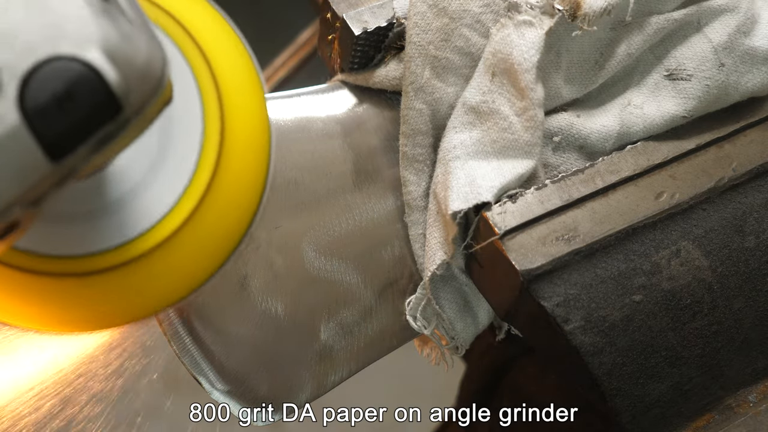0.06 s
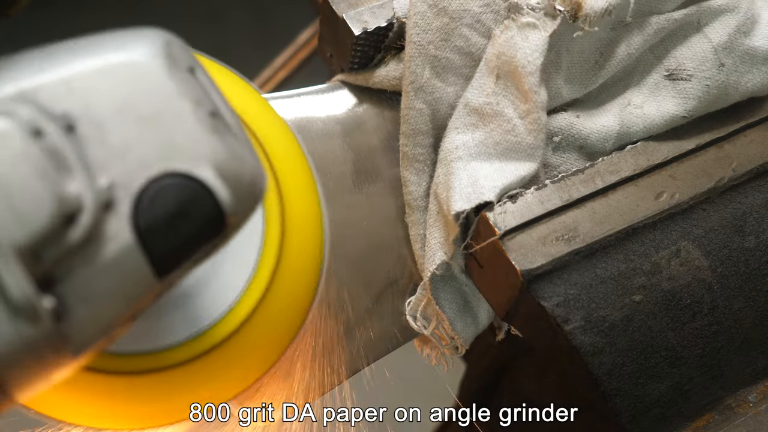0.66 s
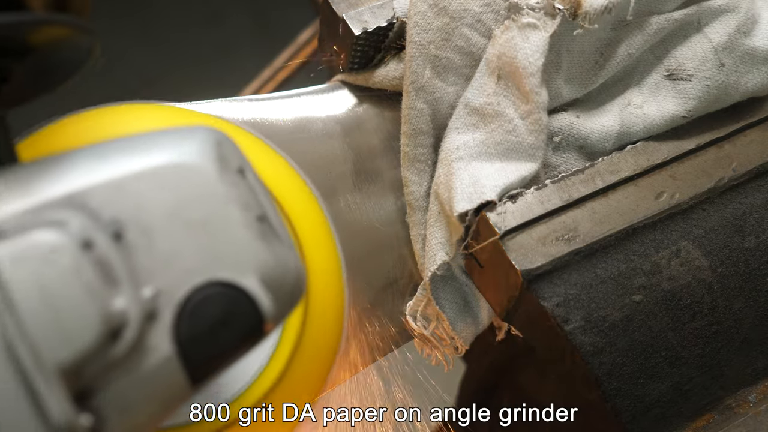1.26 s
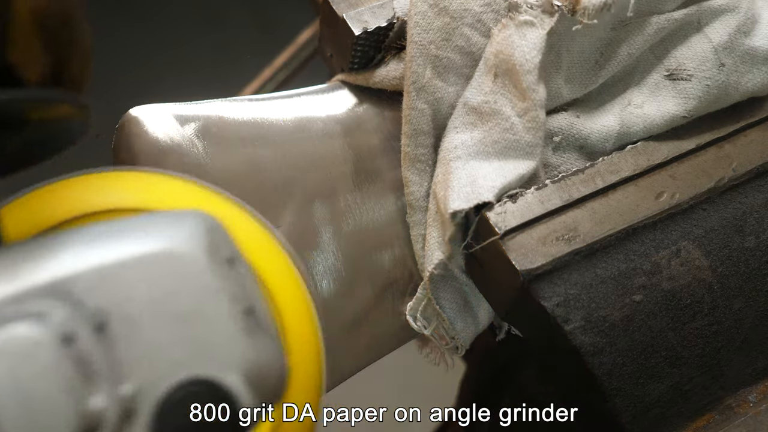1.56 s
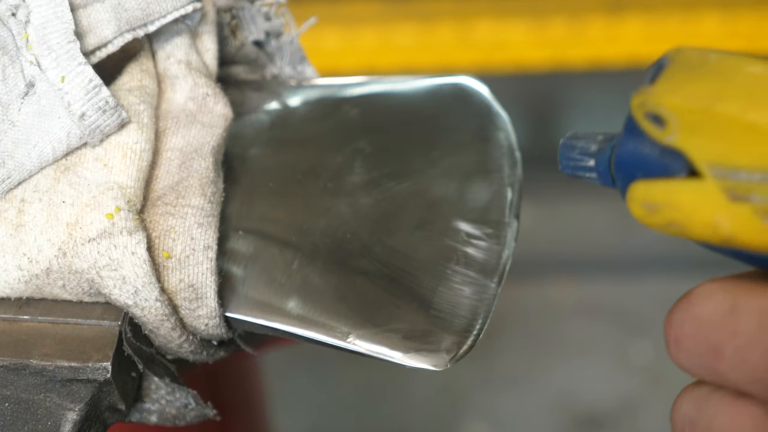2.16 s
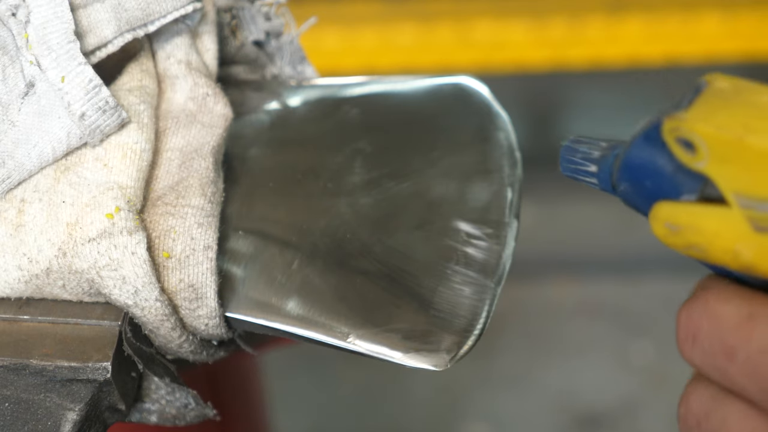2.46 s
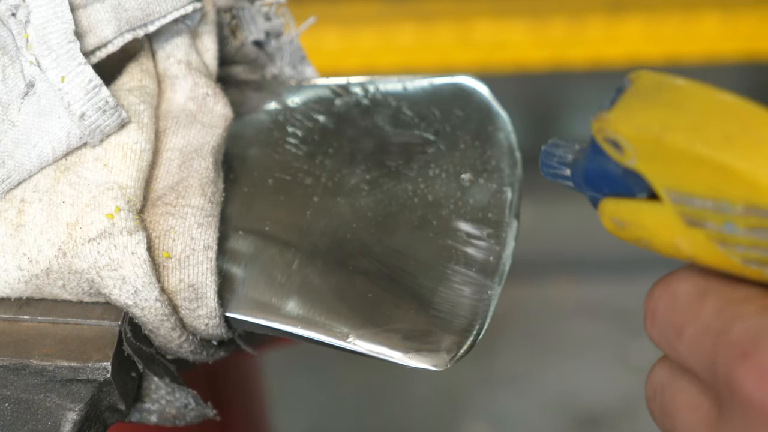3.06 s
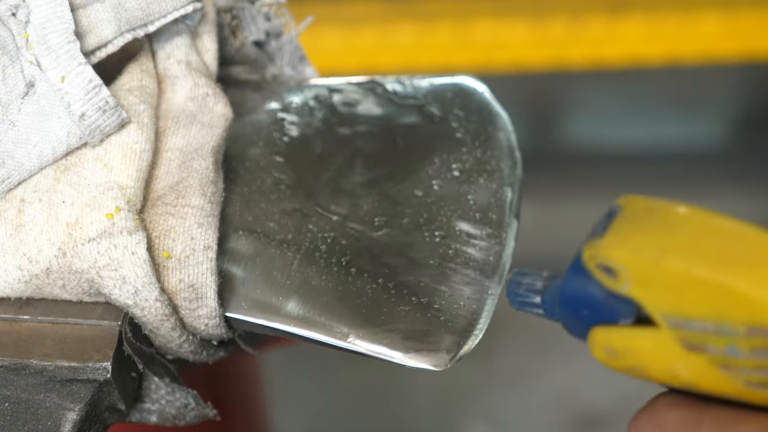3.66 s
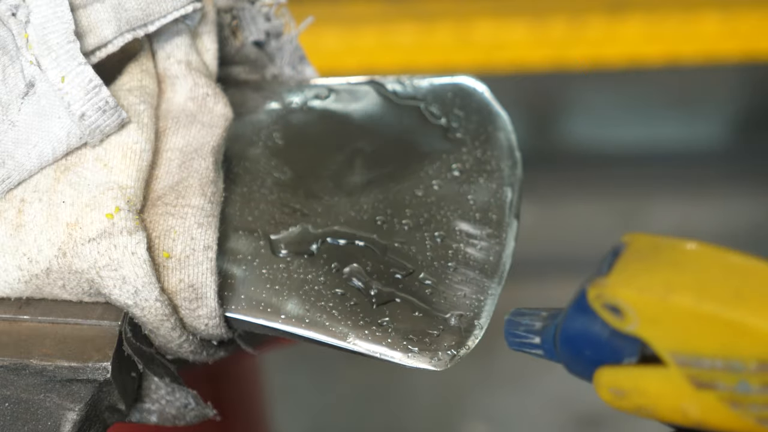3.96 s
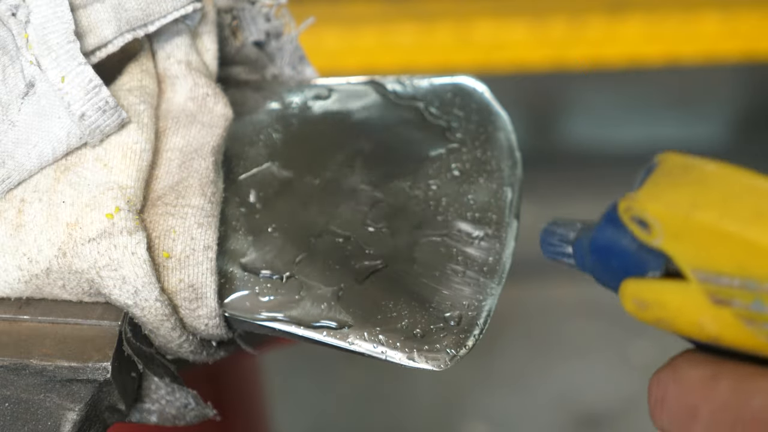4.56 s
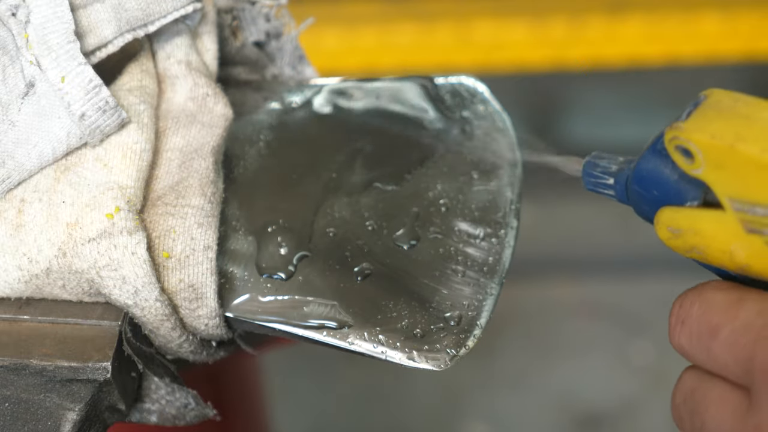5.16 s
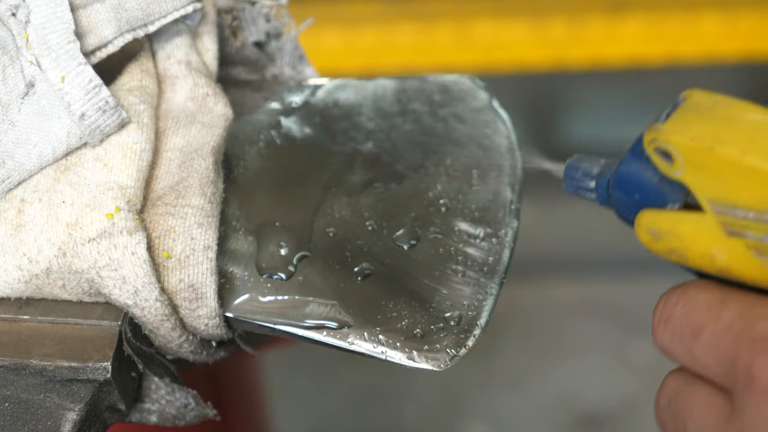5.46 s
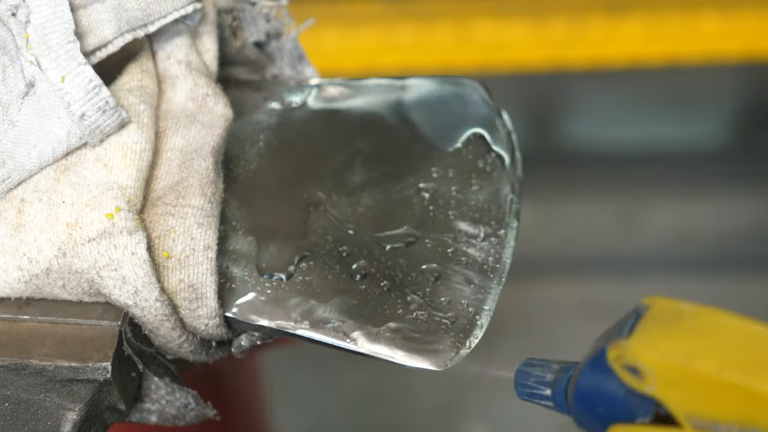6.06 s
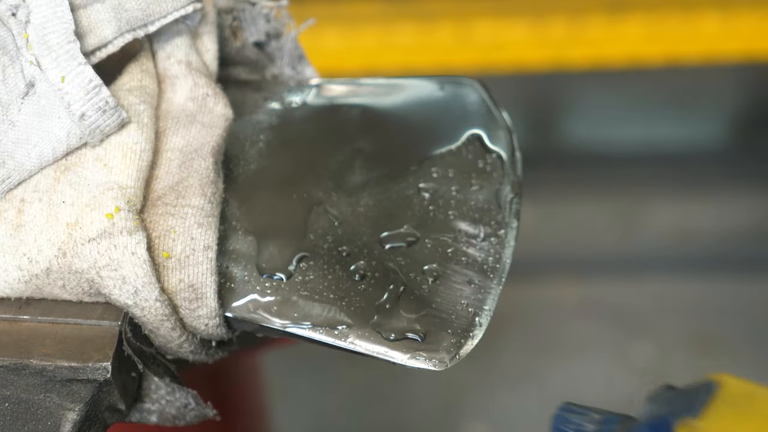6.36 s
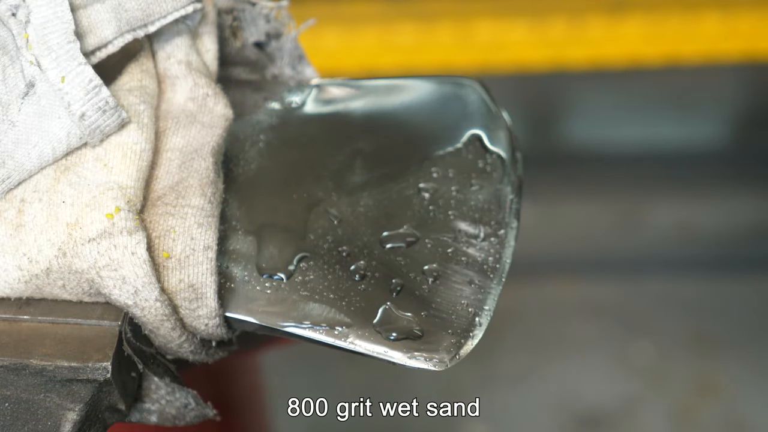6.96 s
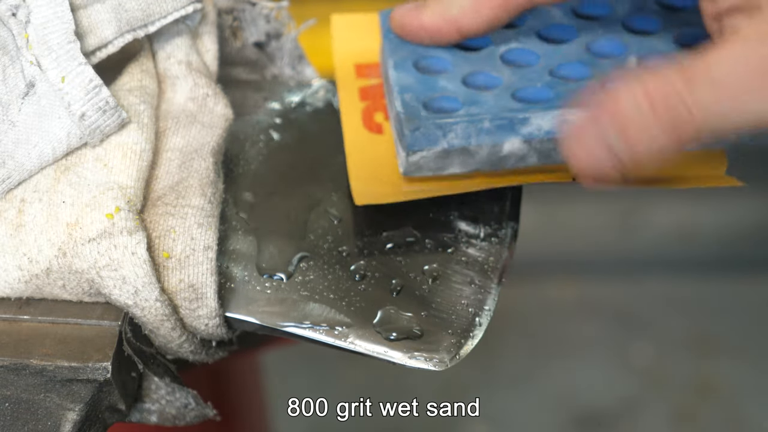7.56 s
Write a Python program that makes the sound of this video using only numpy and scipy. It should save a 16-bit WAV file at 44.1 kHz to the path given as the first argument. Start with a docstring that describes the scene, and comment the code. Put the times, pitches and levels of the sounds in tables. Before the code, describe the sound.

An angle grinder sands a steel axe head with a loud rasp and a high, wavering whine, then fades away. A trigger spray bottle sputters and spits, then mists water in quick squeezes, about four a second, each with a plastic creak, a small thump and a hiss. Near the end, sandpaper rustles and a rubber block knocks onto the metal. The sounds are close, over a low workshop rumble and hum.

```python
"""Grinding, misting and wet-sanding an axe head.

An angle grinder sands the steel, its disc rasping and its bevel gears whining, and fades away.
A trigger bottle sputters the air out of its pump, then mists the steel with water, about four
squeezes a second, each with a creak, a thump and a hiss. Wet-sanding paper rustles and a rubber
block knocks down on the metal. The workshop rumbles and hums underneath."""
import sys
import numpy as np
from scipy import signal
from scipy.fft import rfft, irfft, next_fast_len
from scipy.io import wavfile

SR = 44100
rng = np.random.default_rng(int(sys.argv[2]) if len(sys.argv) > 2 else 0)


def bounce(signal):
    """Save signal as a 16-bit WAV file at the path given by the first command-line argument."""
    frames = np.transpose(np.atleast_2d(signal))
    limited = np.clip(frames, -1, 1)
    pcm = np.round(limited * 32767).astype(np.int16)
    wavfile.write(sys.argv[1], SR, pcm)


N = 344421
TIME = np.arange(N) / SR

# Noise colours, each with columns: frequency_hz, density_db
ROOM_TONE = [(13, -54), (22, -4), (59, -4.5), (160, -12), (174, -11), (194, -19), (270, -16.5), (356, -16),
             (387, -19.5), (539, -20), (1130, -26), (2670, -31), (3320, -30.5), (8490, -37.5), (16000, -56)]  # the workshop's rumble
PAPER_COLOUR = [(240, -34), (570, -8), (1110, -11), (1370, 0), (1530, 4), (1750, -2), (2200, -6), (2800, 0),
                (3400, 1.5), (4310, 1), (6740, -3.5), (7700, 1.5), (8800, 1.5), (9900, -11), (12800, -8.5),
                (16000, -18)]  # abrasive paper rubbing
SPIT_COLOUR = [(600, -24), (1500, 0), (3000, 3.5), (5000, 0), (8400, 8.5), (10500, -4), (13000, 8.5),
               (16000, -14)]  # coarse spray
GURGLE_COLOUR = [(500, -9), (950, 16.5), (2000, -15), (3500, 11), (6000, -0.5)]  # air and water in the pump
MIST_COLOUR = [(240, -10), (400, -2), (496, -15), (607, -4), (1870, -10.5), (2220, -8), (4800, -12),
               (8240, -11), (10400, -20), (13900, -5), (16000, -11)]  # fine spray
JET_WHISTLE = [(4000, -11), (5800, -7.5), (6800, -8), (8300, 8), (9600, -25), (11000, -34)]  # the water jet's lower voice
JET_SIZZLE = [(9000, -22), (11000, -11), (13000, -2), (15000, -2), (16000, -9)]  # its upper voice
GEAR_RATTLE = [(3800, -35), (4400, 10), (4750, 15.5), (5300, 14), (5800, 6), (6100, -29)]  # loaded gears
DISC_RASP = [(100, -24.5), (200, -21.5), (250, -12.5), (400, -11), (520, -5.5), (750, -7), (920, -6),
             (1080, 1), (1400, -4.5), (1800, -6), (2250, -3), (3000, -6), (4000, -4), (4500, -9.5)]  # the disc on steel
DISC_GRIT = [(3500, -38), (4300, -12), (5900, 2.5), (6300, -4), (7600, -3.5), (8700, 1.5), (9600, -9),
             (11000, -9), (12500, -5.5), (14000, -4.5), (16000, -18)]  # the hiss of its grit

# Ringing modes, each with columns: pitch_hz, level_db, t60_s
BLOCK_THUD = [(74, -12, 0.069), (157, -9, 0.032), (257, 6, 0.021), (416, 0.5, 0.022), (584, -2, 0.035)]  # the damped block's low end
BLOCK_CLACK = [(820, 0, 0.022), (1075, -2.5, 0.027), (1380, 4, 0.0099), (2126, -6, 0.037),
               (3060, -3, 0.0068), (4900, -21, 0.0065), (7800, -25, .006)]  # its bright attack
BOTTLE_MODES = [(162, -6, 0.05), (225, 1.5, 0.045), (296, 2, 0.023), (417, -4, 0.032)]  # the bottle's body
SPRING_MODES = [(697, 3, 0.011), (865, -1, 0.029), (1120, 0.5, 0.0054), (1476, -5, 0.026),
                (1940, 0.5, 0.016), (2120, -1, 0.017), (3400, -1.5, 0.0053), (4230, -6, 0.0058)]  # the return spring
LEVER_MODES = [(4580, -9.5, 0.0065), (5720, -10.5, 0.015), (8450, -5.5, 0.0058), (11000, 0, 0.00084),
               (11900, -7.5, 0.0027), (14200, -5, .002)]  # the trigger's thin plastic

# The room tone swells: time_s, level_db
ROOM_SWELL = [(0, -63), (1.2, -58), (2.2, -48), (7.8, -48.5)]
# Paper slides over hand and block: centre_s, half_length_s, level_db, sheet_pitch_hz
SCRAPES = [(6.521, 0.018, -53, 3040), (6.71, 0.018, -49.5, 2040), (6.795, 0.016, -53, 2000),
           (7.022, 0.034, -47.5, 2960), (7.212, 0.013, -34, 3160), (7.259, 0.011, -40, 2600),
           (7.313, 0.012, -40.5, 1500), (7.401, 0.027, -31, 2790), (7.525, 0.019, -34.5, 2530),
           (7.594, 0.0064, -39.5, 4450), (7.622, 0.021, -36.5, 3580), (7.771, 0.011, -46, 3380)]
# Block and paper knock: start_s, clack_db, thud_db, crack_db
KNOCKS = [(6.602, -54, -72, -47), (6.79, -54, -58, -39), (7.069, -26, -47, -30), (7.183, -55, -58, -35.5),
          (7.428, -31, -39, -33), (7.4452, -11.5, -34, -23.5), (7.4529, -9, -20, -28),
          (7.71, -34, -40, -40.5), (7.732, -36, -49, -44)]

# The trigger creaks, thumps on its stop and lets the mist run:
# stop_s, thump_db, creak_lead_s, creak_db, mist_delay_s, mist_length_s, mist_db
SQUEEZES = [(2.883, -38, 0.083, -30.5, .124, 0.044, -50), (3.283, -36.5, 0.088, -29.5, 0.071, 0.17, -43),
            (3.549, -26, 0.057, -26.5, 0.038, 0.099, -40.5), (3.81, -33.5, 0.047, -41, 0.054, 0.17, -49.5),
            (4.097, -35, .054, -33.5, 0.066, 0.18, -49), (4.416, -35, 0.057, -28.5, 0.051, 0.11, -42.5),
            (4.691, -34, 0.051, -34, 0.044, 0.13, -47.5), (4.95, -33.5, .052, -36.5, 0.075, 0.078, -52),
            (5.202, -28.5, 0.046, -34.5, .045, 0.12, -52.5), (5.457, -33.5, 0.037, -39, 0.054, 0.12, -50),
            (5.716, -33.5, 0.046, -35.5, 0.03, 0.12, -50), (5.976, -35, 0.05, -34.5, 0.047, 0.19, -51),
            (6.237, -27, 0.047, -28.5, 0.019, 0.089, -50), (6.449, -37.5, 0.051, -32, .015, 0.022, -65)]
# The spring rattles as the trigger is let go: start_s, level_db, bounce_relative_db
RELEASES = [(3.469, -32, -12), (3.687, -30, -3), (3.791, -33, -20), (3.977, -27.5, -1), (4.13, -37.5, -10),
            (4.294, -28.5, 0), (4.586, -33, -18), (4.836, -31.5, 0.5), (5.096, -28, -3), (5.333, -40, -8),
            (5.607, -28, -3), (5.855, -28.5, -4.5), (6.121, -34, -1.5), (6.336, -32, -3.5)]
# Air sputters out of the dry pump: start_s, length_s, spit_db, gurgle_db
SPUTTERS = [(2.593, 0.072, -43.5, -38.5), (2.607, 0.053, -33, -54), (2.684, .03, -56, -47),
            (2.927, 0.0076, -34, -40), (2.976, 0.021, -35.5, -43), (3.0485, 0.059, -26, -45),
            (3.161, 0.0036, -31.5, -33.5), (3.3084, 0.018, -28, -41), (3.573, 0.077, -42, -49),
            (3.663, 0.048, -47, -47), (3.883, 0.012, -32.5, -55)]
# Drips and air bubbles plink: start_s, level_db, pitch_hz
PLINKS = [(2.7687, -38, 2110), (2.92, -34, 1570), (2.952, -37, 1600), (3.1921, -53, 3220),
          (3.2544, -26, 2350), (3.543, -50, 1760), (6.8806, -40, 2550)]
# Air pockets squeak through the nozzle: start_s, length_s, level_db, first_pitch_hz, last_pitch_hz
CHIRPS = [(2.9892, 0.0044, -13.5, 7460, 7900), (3.303, 0.0052, -16.5, 8300, 9100),
          (3.8204, 0.0043, -25.5, 6000, 9200), (4.433, 0.005, -25, 8100, 12600),
          (4.444, .003, -28, 8400, 11500), (4.71, 0.0068, -29, 6900, 12900),
          (5.23, 0.026, -33.5, 7800, 8900), (5.475, 0.0089, -29.5, 5150, 8100),
          (5.487, 0.0029, -24.5, 7500, 8700), (5.726, 0.0043, -23, 7600, 9400),
          (5.993, .011, -19, 6750, 8800), (6.242, 0.0032, -24, 7500, 9160)]
# The jet bursts out before it fans into mist: start_s, length_s, whistle_db, sizzle_db
JETS = [(2.991, .005, -22.5, -40), (3.318, .017, -35, -30), (3.873, .004, -44, -29),
        (4.149, 0.039, -45, -41), (4.456, 0.012, -40, -37), (4.719, .011, -41, -41),
        (4.995, 0.033, -48.5, -41), (5.239, .013, -42, -39), (5.512, 0.0094, -36, -37),
        (5.734, .011, -42, -40), (6.012, 0.02, -40.5, -39), (6.259, .005, -43, -33)]
# Coarse, airy spray sizzles on the dry steel: start_s, length_s, level_db
SIZZLES = [(3.332, 0.13, -41), (3.553, 0.11, -40), (3.885, 0.038, -38)]
# The biggest drops snap at the nozzle: start_s, level_db, pitch_hz
BIG_DROPS = [(2.7702, -27, 13000), (2.972, -18, 8000), (3.007, -9, 12500), (3.3425, -12, 14000),
             (3.4193, -16, 14200), (3.45, -22, 13400), (3.572, -10, 12900), (3.583, -22, 14000),
             (3.634, -12, 13100), (3.664, -13, 13900), (3.683, -13, 14100), (3.7023, -11, 14100),
             (3.854, -16, 11500), (3.861, -15, 13800), (3.9172, -17, 13900), (3.9757, -14.5, 13000),
             (4.5593, -20, 13700), (4.608, -23, 13000), (4.7469, -17, 8200), (4.907, -31, 12000),
             (4.923, -27, 11500), (4.9884, -16, 11800), (5.436, -31, 13800)]

# The spindle gives way and the gears whine under the hand's pressure:
# time_s, extra_turns_per_s, whine_db
SPINDLE = [(0, 0.94, -28), (0.1, 1.12, -30.5), (0.45, 0.8, -29.5), (0.63, 0.1, -23.3), (0.76, 0.47, -26),
           (0.9, 0, -20.5), (1.01, -0.45, -27), (1.16, 0.6, -21), (1.28, 0.08, -28), (1.39, 1.12, -22),
           (1.48, -0.15, -24.5), (1.55, -0.23, -29.5), (1.67, 4.9, -48), (1.95, 1.9, -41),
           (2.25, 1.33, -30.5), (2.37, -0.16, -28.5), (2.45, 0.5, -27), (2.55, -0.1, -27)]
# Tones of the turning disc and motor: multiple_of_turning_rate, level_db
DISC_ORDERS = [(2, -12.5), (3, -11.5), (4, 0), (6, -5), (8, -20), (16, -6), (17, -14), (31, -30)]
MOTOR_ORDERS = [(1, -16), (2, -13.5), (6, -16), (8, -17), (9, -19), (12, -19)]

CROWN_TEETH, PINION_TEETH, NOMINAL_TURNS_PER_S = 38, 11, 138


def from_db(db):
    """Decibels to gain."""
    return 10 ** (np.asarray(db) / 20)


def rms_one(x):
    """Scale to rms 1."""
    return x / np.sqrt(np.mean(x ** 2) + 1e-20)


def in_time(rows):
    """Each column of an automation curve at every sample."""
    s, *columns = np.transpose(rows)
    return [np.interp(TIME, s, c) for c in columns]


def noise(colour):
    """Noise of the given colour, rolling off steeply beyond its ends; rms 1."""
    hz, level_db = np.transpose(colour)
    size = next_fast_len(N, True)
    f = np.fft.rfftfreq(size, 1 / SR) + 1e-3
    skirts = np.minimum(1, np.minimum(f / hz[0], hz[-1] / f)) ** 2
    gain = from_db(np.interp(np.log(f), np.log(hz), level_db)) * skirts
    return rms_one(irfft(rfft(rng.standard_normal(size)) * gain)[:N])


def drift(rate_hz, hop=40):
    """A smooth random wander; rms about 1."""
    r = np.exp(-2 * np.pi * hop * rate_hz / SR)
    slow = signal.lfilter([1], [1, -2 * r, r * r], rng.standard_normal(N // hop + 2002))[2000:]
    return np.interp(np.arange(N) / hop, np.arange(len(slow)), rms_one(slow))


def clicks(times, level_db):
    """One click at each time."""
    out = np.zeros(N)
    np.add.at(out, np.clip(np.round(np.asarray(times) * SR).astype(int), 0, N - 1), from_db(level_db))
    return out


def die_away(x, t60):
    """Each click becomes a falling envelope of its own height."""
    return signal.lfilter([1], [1, -from_db(-60 / (t60 * SR))], x + 1e-18)


def ring(x, hz, t60):
    """A unit click sets a sine of height 1 ringing."""
    r, w = from_db(-60 / (t60 * SR)), 2 * np.pi * hz / SR
    return signal.lfilter([0, np.sin(w)], [1, -2 * r * np.cos(w), r * r], x + 1e-18)


def strike(times, level_db, modes, travel_s, detune=0):
    """Hits ring a body's modes, each time anew; low bending waves arrive later (travel_s at 1 kHz)."""
    out = np.zeros(N + SR)
    for s, hit_db, chance in zip(times, level_db, rng.standard_normal((len(times), len(modes), 2))):
        for k, ((hz, db, t60), (louder, higher)) in enumerate(zip(modes, chance)):
            at = int((s + travel_s * np.sqrt(1000 / hz)) * SR)
            t = TIME[:int(t60 * SR)]
            fall = from_db(hit_db + db + 2.5 * louder - 60 * t / t60)
            out[at:at + len(t)] += (-1) ** k * fall * np.sin(2 * np.pi * hz * np.exp(detune * higher) * t)
    return out[:N]


def bursts(starts, lengths, level_db, sag_db_per_s, release_s, attack_s):
    """Envelope of flows that open, sag with the pressure and then shut off."""
    out = np.zeros(N)
    for s, length, db in zip(starts, lengths, level_db):
        at = int(s * SR)
        t = TIME[:min(SR // 2, N - at)]
        gate = (1 - np.exp(-t / attack_s)) * np.exp(-np.maximum(t - length, 0) / release_s)
        out[at:at + len(t)] += from_db(db - sag_db_per_s * t) * gate
    return out


def bubbles(per_s, low_hz, high_hz, cycles, count=14):
    """Bubbles of random size burst at random, each ringing briefly at its own pitch; rms 1."""
    born = rng.random(N) * SR < per_s
    sizes = born * from_db(4 * np.minimum(rng.exponential(1, N), 3.5)) * rng.choice([-1, 1], N)
    voice = rng.integers(0, count, N)
    pitches = np.geomspace(low_hz, high_hz, count)
    return rms_one(sum(ring(sizes * (voice == k), hz, cycles / hz) for k, hz in enumerate(pitches)))


def flutter(per_s, uneven, steady):
    """Air and water take turns in the nozzle, in a fast, uneven train of tiny puffs; rms 1."""
    count = np.floor(np.cumsum(per_s * np.exp(uneven * drift(30))) / SR)
    puffs = np.diff(count, prepend=0) * from_db(2 * rng.standard_normal(N))
    return rms_one(steady + die_away(puffs, t60=.009))


def workshop(hum_hz=194.3):
    """The bed: a low rumble and a gently wavering hum swell in together."""
    swell_db, = in_time(ROOM_SWELL)
    hum = np.sqrt(2) * from_db(-5.5 + drift(1.9)) * np.sin(2 * np.pi * hum_hz * TIME)
    return from_db(swell_db) * (from_db(-3) * noise(ROOM_TONE) + hum)


def reflections(x, t60=.45, wall_hz=6500, predelay_s=.0038):
    """The diffuse, dulled reverb of a cluttered workshop."""
    t = TIME[:SR // 2]
    tail = rng.standard_normal(len(t)) * from_db(-60 * t / t60) * (t > predelay_s)
    tail = signal.sosfilt(signal.butter(1, wall_hz, fs=SR, output="sos"), tail)
    return signal.fftconvolve(x, tail / np.sqrt(np.sum(tail ** 2)))[:N]


def paper_scrapes(grains_per_s=1800):
    """Grains of the abrasive catch and slip under each swish and set the bent sheet ringing."""
    catches = (rng.random(N) * SR < grains_per_s) * from_db(1.6 * rng.standard_normal(N))
    grit = rms_one(1.2 + die_away(catches, t60=.002)) * noise(PAPER_COLOUR)
    out = np.zeros(N)
    for s, half_s, db, hz in SCRAPES:
        swish = from_db(db - 1.5) * np.exp(-((TIME - s) / half_s) ** 2 / 2)
        sheet = from_db(-10) * rms_one(ring(grit, hz, t60=.036))
        out += swish * (grit + sheet)
    return out


def block_knocks(flex_s=.00323):
    """The block lands with a thud, a clack and a gritty crack; its rubber flexes and touches again."""
    s, clack_db, thud_db, crack_db = np.transpose(KNOCKS)
    thud = strike(s, thud_db + .3, BLOCK_THUD, travel_s=.00053)
    clack = strike(s, clack_db - 8.5, BLOCK_CLACK, travel_s=.00038)
    second_touch = strike(s + flex_s, clack_db - 24, BLOCK_CLACK, travel_s=.00021)
    hits = clicks(s, crack_db - 2)
    crack = (die_away(hits, t60=.05) + die_away(hits, t60=.002)) * noise(PAPER_COLOUR)
    return thud + clack + second_touch + crack


def trigger_creaks(slip_s=.0028, slowing=.04, fall_db=.6, count=11):
    """The pulled trigger creaks in a slowing, weakening run of slips, then ticks on its stop."""
    slips = [(s - lead + slip_s * (k + slowing * k * k + .2 * rng.standard_normal()),
              db - fall_db * k + 2.5 * rng.standard_normal())
             for s, _, lead, db, *_ in SQUEEZES for k in range(count)]
    ticks = [(s, db + 5) for s, db, *_ in SQUEEZES]
    s, db = np.transpose(slips + ticks)
    plastic = strike(s, db, LEVER_MODES, travel_s=.0003, detune=.015)
    scuff = die_away(clicks(s, db - 8.5), t60=.013) * noise(SPIT_COLOUR)
    return plastic + scuff


def bottle_thumps(low_cut_hz=140):
    """The trigger thumps the small bottle and settles; the pitch shifts with the grip."""
    s, db = np.transpose(SQUEEZES)[:2]
    thump = strike(s + .002, db + .5, BOTTLE_MODES, travel_s=.00018, detune=.05)
    settle = strike(s + .00696, db - 4, BOTTLE_MODES, travel_s=.00068, detune=.05)
    return signal.sosfilt(signal.butter(2, low_cut_hz, "high", fs=SR, output="sos"), thump + settle)


def spring_rattle(bounce_s=.0088):
    """The return spring taps three times as the trigger is let go."""
    s, db, bounce_db = np.transpose(RELEASES)
    gap = bounce_s * (1 + .11 * rng.standard_normal(len(s)))
    return sum(strike(s + k * gap, db - 6 + tap_db, SPRING_MODES, travel_s=.00071, detune=.05)
               for k, tap_db in enumerate([0, bounce_db, bounce_db + (-8)]))


def plinks():
    """Each pocket of air rings briefly at its own pitch."""
    return sum(ring(clicks([s], [db + .5]), hz, t60=.014) for s, db, hz in PLINKS)


def pop(t, hz, life_s=.00033, rise_per_s=60):
    """One tiny bubble swells, rises in pitch and dies; height about 1."""
    return np.sin(2 * np.pi * hz * (t + rise_per_s * t * t / 2)) * t / life_s * np.exp(1 - t / life_s)


def chirps(bubbles_per_s=450, pitch_spread=.089):
    """A pocket of air leaves as a quick, roughly rising run of bubbles."""
    out, t = np.zeros(N), TIME[:SR // 150]
    for s, length, db, first_hz, last_hz in CHIRPS:
        along = np.linspace(0, 1, 1 + int(np.ceil(length * bubbles_per_s)))
        for part, (late, higher, louder) in zip(along, rng.standard_normal((44, 3))):
            at = int((s + length * part + .0001 * late) * SR)
            hz = first_hz * (last_hz / first_hz) ** part * np.exp(pitch_spread * higher)
            out[at:at + len(t)] += from_db(db - 1.5 + 2.2 * louder) * pop(t, hz)
    return out


def spitting(stop_spit_s=.016):
    """The nozzle spits and gurgles at each sputter and as the trigger reaches its stop."""
    stops = [(s - .001, stop_spit_s, db - 12, db - 14) for s, db, *_ in SQUEEZES]
    s, length, spit_db, gurgle_db = np.vstack([SPUTTERS, stops]).T
    spit = bursts(s, length, spit_db + .8, sag_db_per_s=66, release_s=.005, attack_s=.00068)
    gurgle = bursts(s, length, gurgle_db + .5, sag_db_per_s=15, release_s=.0095, attack_s=.00069)
    spray = noise(SPIT_COLOUR)
    froth = noise(GURGLE_COLOUR) + .84 * bubbles(per_s=2000, low_hz=1210, high_hz=3600, cycles=5.1)
    return flutter(per_s=235, uneven=.41, steady=.55) * (spit * spray + gurgle * rms_one(froth))


def jets():
    """Each jet swells for a moment, whistling and sizzling, then breaks off."""
    s, length, whistle_db, sizzle_db = np.transpose(JETS)
    voices = np.zeros(N)
    for colour, db in [(JET_WHISTLE, whistle_db), (JET_SIZZLE, sizzle_db)]:
        swell = bursts(s, length, db - .5, sag_db_per_s=-130, release_s=.0015, attack_s=.0006)
        voices += swell * noise(colour)
    return voices * flutter(per_s=550, uneven=.32, steady=.22)


def drops(flow, per_s=14, t60=.003):
    """Big drops snap at the nozzle and small ones fly with the flow, each with a tiny splash."""
    small = (rng.random(N) * SR < per_s) * flow * from_db(15 + 2 * rng.standard_normal(N))
    snaps = sum(ring(clicks([s], [db - 6.5]), hz, t60) for s, db, hz in BIG_DROPS)
    s, db, _ = np.transpose(BIG_DROPS)
    splash = die_away(clicks(s, db) + small, t60=.005) * from_db(-13) * noise(SPIT_COLOUR)
    return snaps + ring(small, hz=11000, t60=t60) + splash


def mist(release_s=.038, trail_s=.066):
    """A soft hiss sags with the pump's pressure and trails each sputter, with fizz and drops in it."""
    stop, *_, delay, length, mist_db = np.transpose(SQUEEZES)
    flow = bursts(stop + delay, length, mist_db, sag_db_per_s=42, release_s=release_s, attack_s=.0037)
    s, _, spit_db, _ = np.transpose(SPUTTERS)
    trails = bursts(s, [trail_s] * len(s), spit_db - 19,
                    sag_db_per_s=17, release_s=release_s, attack_s=.05)
    hiss = np.maximum(flow, trails) * noise(MIST_COLOUR) * from_db(3.2 * drift(370))
    sizzle = bursts(*np.transpose(SIZZLES), sag_db_per_s=7, release_s=.0054, attack_s=.003)
    fizz = (sizzle + flow * from_db(-12)) * bubbles(per_s=260, low_hz=12400, high_hz=15000, cycles=26)
    return hiss + fizz + drops(flow)


def tones(turns, orders, waver_db):
    """Wavering harmonics of a turning part."""
    return sum(np.sqrt(2) * from_db(db + waver_db * drift(11))
               * np.sin(2 * np.pi * (k * turns + rng.random())) for k, db in orders)


def bevel_gears(angle, motor_turns, whine_db, rattle_db, mains_pulse_hz=120):
    """Teeth whine and rattle under a load that swings with each turn and each mains half wave."""
    mains = 2 * np.pi * mains_pulse_hz * TIME
    load = rms_one((1 + .45 * np.cos(angle)) * (1 + .3 * np.cos(mains) + .48 * np.sin(2 * mains)))
    # the teeth chatter, and mesh early and late as the crown wheel turns
    teeth = CROWN_TEETH * angle - .22 * np.sin(angle) + .06 * drift(39)
    # the off-centre pinion adds a tone one motor order higher
    mesh = np.sqrt(2) * (np.sin(teeth) + from_db(-11.5) * np.sin(teeth + 2 * np.pi * motor_turns))
    whine = load * from_db(whine_db + 2.5 + .2 * drift(14)) * mesh
    rattle = rms_one(11 + load) * from_db(rattle_db) * noise(GEAR_RATTLE)
    return whine + rattle


def sanding_disc(angle, rasp_db, grit_db):
    """The disc rasps and hisses on the steel, pressing harder once a turn."""
    pressure = rms_one(1 + .078 * np.cos(angle)) * from_db(.45 * drift(60))
    rasp = from_db(rasp_db) * noise(DISC_RASP)
    grit = from_db(grit_db + .46 * drift(294)) * noise(DISC_GRIT)
    return pressure * (rasp + grit)


def grinder(edge_s=.7, lift_turns_per_s=1.67, fade_s=1.12, fade_end_s=2.589):
    """The motor drives a wobbling, unbalanced disc through bevel gears, and the whole tool fades out."""
    faster, whine_db = in_time(SPINDLE)
    turns = np.cumsum(NOMINAL_TURNS_PER_S + faster) / SR
    motor_turns = turns * CROWN_TEETH / PINION_TEETH
    angle = 2 * np.pi * turns
    # the disc bites the edge, a little brighter and louder, then moves on to the flat
    on_edge = np.exp(-(TIME / edge_s) ** 2)
    # at its fastest it has all but left the steel: the wobble drops out and the rattle eases
    lifted = .5 + .5 * np.tanh((faster - lift_turns_per_s) / .052)
    rasp_db = -23.5 + 1.77 * on_edge - .23 * lifted
    grit_db = -29 + 4.5 * on_edge - .23 * lifted
    rattle_db = -27 + .5 * on_edge - 3 * lifted + .35 * drift(19)
    gears = bevel_gears(angle, motor_turns, whine_db, rattle_db)
    disc = sanding_disc(angle, rasp_db, grit_db)
    wobble = from_db(-37 - 47 * lifted) * tones(turns, DISC_ORDERS, waver_db=1)
    unbalance = from_db(-47 + 1.9 * drift(18)) * np.sin(angle)
    motor = from_db(rasp_db - 1) * tones(motor_turns, MOTOR_ORDERS, waver_db=2)
    fade = np.sin(np.pi / 2 * np.clip((fade_end_s - TIME) / fade_s, 0, 1))
    return (gears + disc + wobble + unbalance + motor) * fade


def scene():
    """A close mono mix over the workshop bed, with a touch of reverb on the bottle and the sanding."""
    bed = workshop()
    bottle = trigger_creaks() + spitting() + chirps() + jets() + plinks() + mist()
    bottle += bottle_thumps() + spring_rattle()
    sanding = block_knocks() + paper_scrapes()
    reverb = reflections(from_db(-12) * bottle + from_db(-16.5) * sanding)
    return (bed + reverb + sanding + bottle + grinder())[None]


def record(dry):
    """A steep high cut at 16.1 kHz."""
    return signal.sosfilt(signal.ellip(12, .1, 90, 16100, fs=SR, output="sos"), dry)


dry = scene()
out = record(dry)
bounce(out)
```